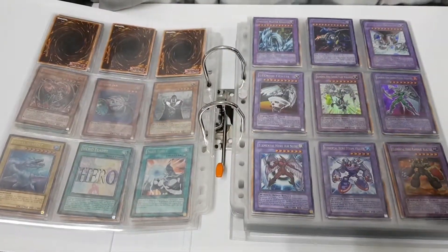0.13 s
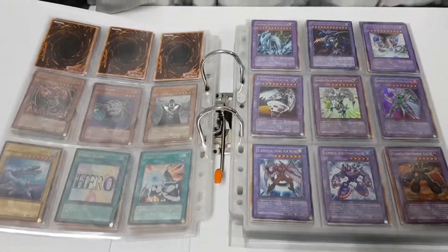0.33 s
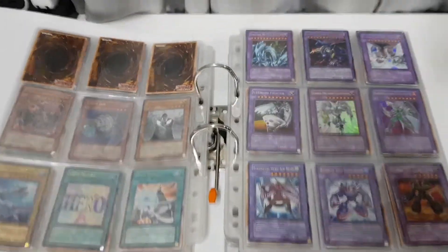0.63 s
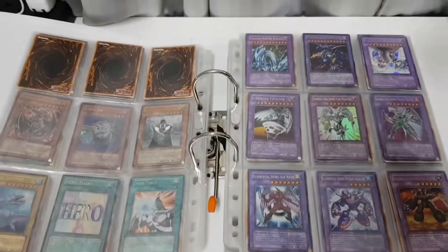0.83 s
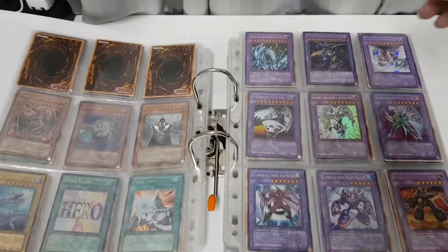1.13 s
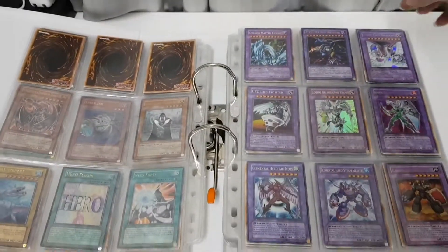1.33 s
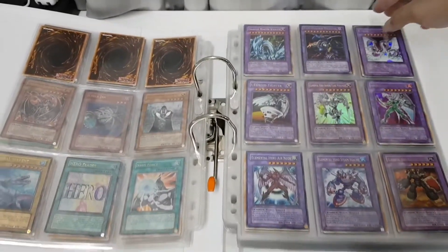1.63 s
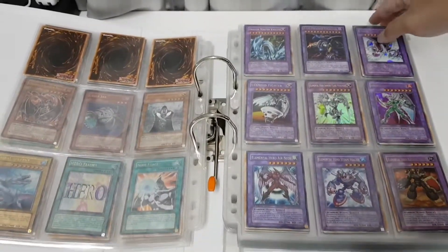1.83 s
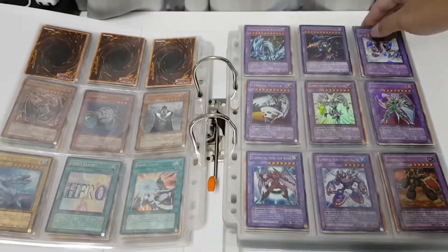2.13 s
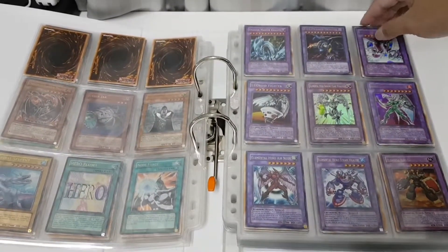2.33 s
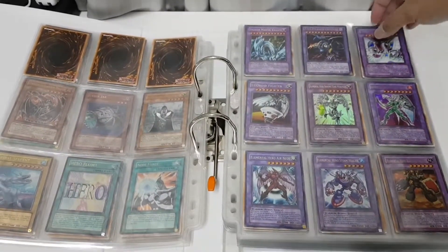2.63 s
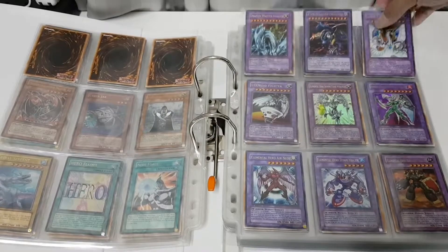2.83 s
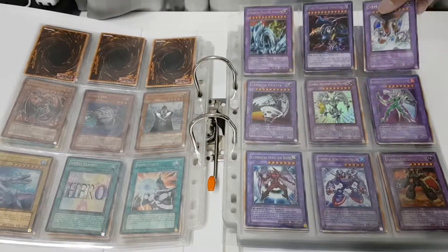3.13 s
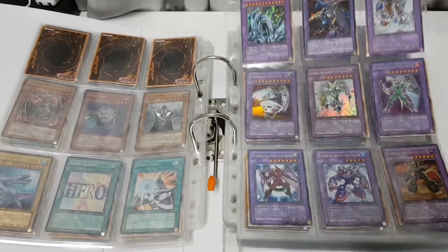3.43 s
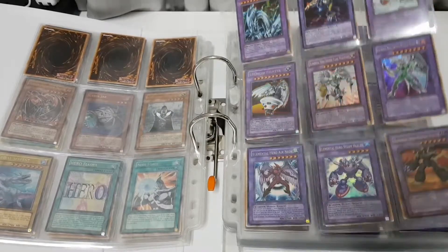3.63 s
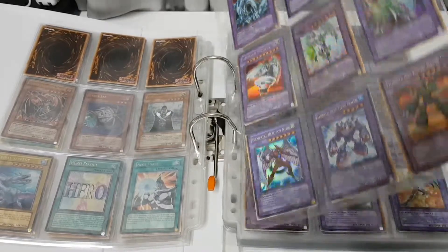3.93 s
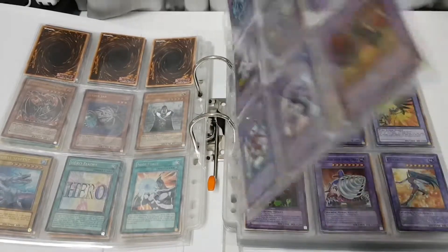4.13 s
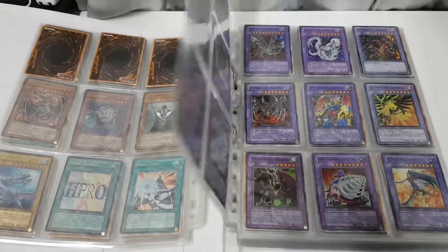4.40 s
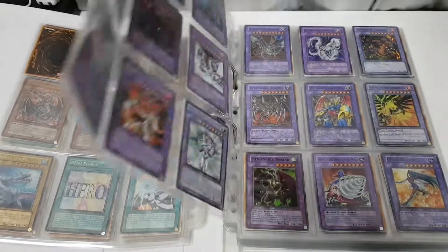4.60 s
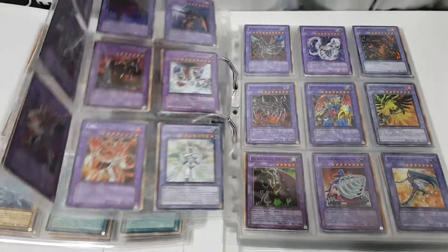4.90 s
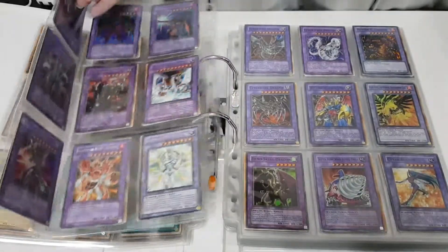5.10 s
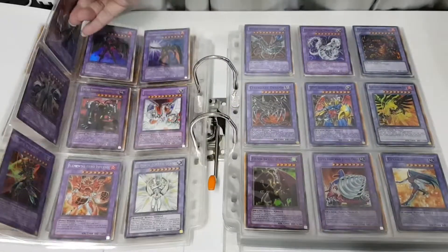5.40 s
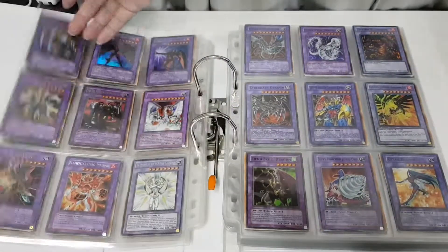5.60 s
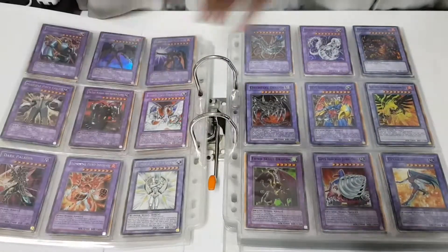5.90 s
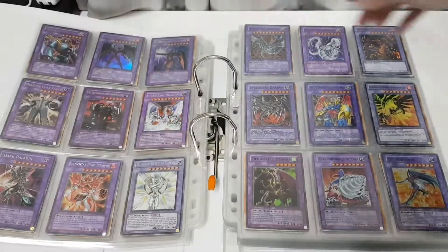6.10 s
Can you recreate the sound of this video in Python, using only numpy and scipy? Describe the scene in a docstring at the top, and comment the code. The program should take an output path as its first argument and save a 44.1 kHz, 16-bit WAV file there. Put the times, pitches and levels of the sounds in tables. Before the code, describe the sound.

Indoors, a low hum of traffic and passing engines comes through the walls, with faint microphone hiss. Early on, wood is knocked twice with a short echo. Nearby, a plastic binder page clicks and crinkles as it is picked up, slides softly, then turns over in a busier cluster of taps and crackles, ending in a small thump as it settles flat.

```python
"""Turning pages in a ring binder

Stiff plastic sleeve pages are lifted and turned on a table. They snap as creases let go, rustle and
scrape as they slide, and one lands with a thump. Two knocks on wood echo from across the room.
Engines and traffic in the street drone through the walls, over a soft microphone hiss."""
import sys
import numpy as np
from scipy import signal
from scipy.fft import rfft, irfft, next_fast_len
from scipy.io import wavfile
from scipy.ndimage import uniform_filter1d

SR = 44100
rng = np.random.default_rng(int(sys.argv[2]) if len(sys.argv) > 2 else 0)


def persist_wave(psi):
    """Save psi, clipped to +-1, as 16-bit WAV."""
    counts = np.round(np.clip(psi, -1, 1) * 32767).astype(np.int16)
    wavfile.write(sys.argv[1], SR, np.atleast_2d(counts).T)


N = 275713
TIME = np.arange(N) / SR
BANDS_HZ = 22 * 2 ** np.arange(0, 9.6, .5)  # half an octave apart

# The five parts of a page's sound, each (frequency [Hz], level [dB])
CRACKLE_TONE = [(5800, -2.5), (6800, 2.5), (7700, 7.5), (8800, -0.5), (9800, -3.5), (11000, -26)]  # small creases
FIZZ_TONE = [(8800, -25.5), (10000, 1), (11000, 0), (12600, 5.5), (14000, -4.5), (15500, -2)]  # the finest creases
FILM_TONE = [(2800, -14.5), (3400, -3), (4000, 3), (4400, -0.5), (5400, -2), (6200, -3), (7200, -34)]  # thin film
POCKET_TONE = [(1400, -28), (1700, -6.5), (2100, -10), (2700, -9), (3300, -14), (4200, -54)]  # card pockets
SHEET_TONE = [(500, -25), (800, 10), (1050, 2.5), (1400, 2.5), (2100, -30)]  # the whole sheet bending
PAGE_PARTS = (CRACKLE_TONE, FIZZ_TONE, FILM_TONE, POCKET_TONE, SHEET_TONE)
# How much louder the fizz is than the crackle: (time [s], level [dB])
FIZZ_OVER_CRACKLE = [(0, -13), (2.3, 0), (2.6, -2), (2.97, 4.5), (3.21, 7.5), (5, -18), (5.345, 1.5),
                     (5.38, 3), (5.64, -2), (5.7, 4), (5.74, -1)]
# Snaps and taps: (time [s], crackle [dB], film [dB], pockets [dB], sheet [dB], share sent to room [dB])
PAGE_SNAPS = [(0.148, -75, -75, -44.5, -47, -12), (2.362, -51, -62, -68, -70, -11),
              (2.386, -39, -52, -50, -47, -6), (2.529, -55, -54, -61, -67, -15),
              (2.556, -45, -47, -60, -62, -15), (2.583, -39, -51, -56, -56, -24),
              (2.5907, -43, -39, -52, -55, -33), (2.597, -42, -41, -61, -42, -22),
              (2.795, -57, -53.5, -83, -77, -4), (2.967, -33, -49, -41, -40, -9),
              (3.2147, -31.5, -46, -69, -42, -6.5), (3.45, -74, -73, -66, -55, -13),
              (3.943, -60, -57, -63, -56, -1), (3.98, -65, -75, -63, -42.5, -22),
              (4.9922, -65, -56, -57, -37.5, -2), (5.047, -62, -63, -57, -40, -17),
              (5.066, -51, -55, -54, -60, -2), (5.108, -55, -56, -53, -34, -18),
              (5.3449, -47, -59, -64, -34.5, -5), (5.3525, -36, -29.5, -44, -59, -20),
              (5.3737, -58, -46, -43, -29, -15), (5.658, -30, -25.5, -58, -75, -26),
              (5.739, -40.5, -31.5, -25.5, -31, -18)]
# A page landing flat: (time [s], level [dB], pitch [Hz], time to fade 60 dB [s])
PAGE_LANDING = [(5.738, -30, 408, 0.032)]
# Sheets sliding: (loud from [s], swell [s], hold [s], crackle [dB], film [dB], pockets [dB], sheet [dB])
PAGE_SLIDES = [(0.0, .01, 0.042, -91, -77, -58, -66), (0.05, 0.027, 0.041, -77, -73.5, -74, -72),
               (0.14, .03, 0.029, -89, -79, -64, -63), (2.28, 0.1, 0.052, -77, -78, -76, -88),
               (2.382, 0.04, 0.0081, -62.5, -69, -66, -62.5), (2.465, 0.089, 0.061, -69.5, -76, -80, -71),
               (2.582, 0.076, 0.0047, -56.5, -64, -66, -63), (3.91, 0.054, 0.056, -90, -89, -83, -63.5),
               (4.0, 0.026, 0.085, -96, -92, -83, -68), (5.02, 0.081, 0.1, -77, -73.5, -73, -59.5),
               (5.17, 0.096, 0.13, -80, -77.5, -69.5, -68), (5.352, 0.047, 0.024, -61.5, -59.5, -60.5, -57),
               (5.401, 0.056, 0.055, -89, -79, -76, -71), (5.54, 0.15, 0.091, -79, -79, -76, -78),
               (5.646, 0.016, 0.012, -56, -55, -67, -82), (5.689, 0.034, 0.0062, -53, -66, -67, -89)]
# Edges dragging:
# (loud from [s], swell [s], hold [s], first pitch [Hz], last pitch [Hz], band width [Hz], level [dB])
EDGE_DRAGS = [(2.459, 0.033, 0.13, 5500, 5400, 900, -68.5), (2.475, .02, .03, 3370, 3370, 900, -74),
              (3.044, .03, .15, 1850, 1850, 401.3, -78), (3.907, 0.038, 0.13, 1104, 1465, 450, -69),
              (4.061, .03, 0.058, 829, 896, 250, -68), (4.051, .03, 0.044, 1490, 1690, 700, -75),
              (5.311, .03, .03, 7370, 6800, 1500, -67), (5.536, 0.045, 0.043, 6260, 6100, 1400, -74),
              (5.613, 0.027, 0.032, 6300, 6400, 1800, -67.5), (5.751, .01, 0.044, 1406, 1785, 700, -59.5)]
# Where the page is: (time [s], left louder by [dB], left later by [ms])
PAGE_PATH = [(0, 5, 0.14), (.3, 4.5, 0.13), (2.2, 13, -0.0043), (3.2, 1, 0.21), (4.1, 6, 0.064),
             (5, 7.5, -0.29), (5.5, 11, -0.14), (6.25, -19, -0.15)]

# Knocks: (time [s], level [dB], left louder by [dB], brightness [dB per octave])
KNOCK_BLOWS = [(0.566, -26.5, 0.5, -2), (0.852, -33.5, 3.5, -6)]
# The notes the wood rings at: (frequency [Hz], level [dB], time to fade 60 dB [s])
WOOD_NOTES = [(266, -7, .18), (360.7, -7.5, 0.33), (469, 0, 0.079), (550, -16, 0.2), (830, -8, 0.27),
              (948, -16, .15), (1105, -11, 0.17), (1236, -11, 0.19), (1310, -20, .1), (1434, -3, 0.09),
              (1778, -7, 0.079), (2003, -12.5, 0.097), (2265, -19, .1)]
# The short crack of a knock: (frequency [Hz], level [dB])
CRACK_TONE = [(130, -11), (240, 5.5), (460, 3), (640, -5), (820, 1.5), (1050, -1.5), (1400, -1),
              (1900, -8.5), (2300, -14.5), (2750, -18), (3400, -23.5), (4300, -27.5), (6000, -39),
              (9000, -51.5)]
# What hard walls send back of a knock: (frequency [Hz], level [dB])
WALL_ECHO_TONE = [(1500, 4), (3500, 3.5)]
# How long the room echoes: (frequency [Hz], time to fade 60 dB [s])
ROOM_FADE = [(250, 0.23), (1000, 0.27), (3000, 0.31), (8000, 0.29), (14000, 0.21)]

# Passing engines, one list each: (time [s], firing rate [Hz], level [dB], brightness [dB per octave])
ENGINE_PASSES = [
    [(0.0, 45.85, -50, 2.5), (0.19, 46.58, -61, 15), (0.466, 44.82, -47.5, 3.5), (0.74, 45.08, -43, -0.5),
     (1.15, 45.91, -50.5, 0.5), (1.4, 45.7, -51, -9)],
    [(1.1, 26.65, -60, -5), (1.67, 28.93, -40.5, 4), (1.84, 29.25, -58, 18.5), (2.25, 31.22, -46, -1),
     (2.48, 31.98, -50.5, 7.5), (2.95, 34.09, -47, 2), (3.3, 35.48, -45, -3.5), (3.55, 35.73, -54, -3.5),
     (3.7, 35.4, -47, -3.5), (3.95, 35.62, -61, 4), (4.1, 35.44, -48, -2.5), (4.98, 33.71, -61, 10.5),
     (5.3, 33.52, -53, -4.5)],
    [(1.95, 45.72, -53.5, 9.5), (2.19, 46.5, -39, -4.5), (2.55, 46.74, -70.5, 14.5)],
    [(4.9, 42.56, -47, 1.5), (5.144, 43.18, -45, -5.5), (5.406, 47.12, -44.5, -5.5), (5.6, 48.21, -43, 3.5),
     (5.67, 48.64, -53.5, 11.5), (5.75, 48.86, -43.5, -0.5), (5.88, 49.64, -50.5, 1), (5.98, 50.75, -52, 8),
     (6.148, 52.9, -47, 1.5), (6.25, 52.7, -56, 12.5)],
]
# Overtones at 2, 3, 4... times the firing rate, one row for each engine: (level [dB], ...)
ENGINE_OVERTONES = [(1.5, -6.5, -21.5, 2.5, -2, -21.5, -32.5),
                    (-1.5, 3.5, -5.5, -1, 0, -7.5, -11.5, -14.5, -14.5),
                    (-19, -7.5, -11, -14, -5.5, -9, -12), (-9.5, 0, -17, -49, -7.5, -7.5, -14.5)]
# What gets indoors, where the room booms near 140 Hz: (frequency [Hz], gain [dB])
THROUGH_WALLS = [(60, -11), (120, -3.5), (140, 9.5), (160, -3.5), (250, -2), (350, -0.5), (500, -29.5)]
# A deep, sinking tone: (time [s], pitch [Hz], level [dB])
DEEP_TONE = [(0.0, 40.5, -47.5), (0.5, 40.8, -51), (1.03, 38.45, -52), (2.1, 33.91, -58)]
# Loudness of far traffic: (time [s], level [dB])
TRAFFIC_LEVEL = [(0.0, -37.5), (0.29, -41), (0.73, -35.5), (1.0, -39.5), (2.12, -44.5), (3.24, -43.5),
                 (4.74, -45), (6.25, -40.5)]
# Tone of far traffic: (frequency [Hz], level [dB])
TRAFFIC_TONE = [(13, -31), (25, -13), (36, -3), (71, -5.5), (120, -2), (190, -5.5), (290, -11.5),
                (334, -13), (609, -34), (808, -33.5), (1090, -46.5), (1500, -56), (1950, -82)]
# How alike the traffic is in both ears: (frequency [Hz], likeness [0 to 1])
EAR_LIKENESS = [(40, 1), (130, 0.87), (300, 0.97), (640, 0.05), (1200, 0)]
# Soft, airy swells of the background noise above 450 Hz: (time [s], boost [dB])
MIDRANGE_SWELL = [(0, 1), (1.2, -2), (2.2, 7.5), (3.4, 0.5), (5, 5), (5.6, 8), (6.25, 8.5)]
# Microphone hiss: (frequency [Hz], level [dB])
HISS_TONE = [(760, -41), (1300, -3.5), (1890, -4.5), (2580, -6.5), (2860, -8.5), (4240, -8), (5970, -10.5),
             (9000, -10), (14900, -7), (15500, -11)]
# Tone of a faint, narrow hiss: (frequency [Hz], level [dB])
THIN_HISS_TONE = [(6900, -24), (7550, -2), (7850, -2), (8500, -24)]
# Loudness of that narrow hiss: (time [s], level [dB])
THIN_HISS_LEVEL = [(0, -89), (.5, -101.5), (4.4, -104), (4.7, -83), (5.8, -83), (6.0, -100)]


def snaps(fade_s=0.011, bounce_s=0.00045, bounce_db=-14):
    """A crease lets go: all five parts give a burst of noise, and the room gets one short pulse."""
    t = np.arange(4096) / SR
    high = np.zeros((2, N + len(t)))
    low, to_room = np.zeros((2, N + len(t)))
    click = 1. * (np.arange(len(t)) == 200)
    pulses = [colour(click, tone) / np.sqrt(len(t)) for tone in PAGE_PARTS]
    attack = 1 - np.exp(-8 * t / fade_s)
    part_fades_s = fade_s * np.array([1.06, 0.79, 0.71, 1.55, 1.38])  # big parts ring longer
    for start, *parts_db, room_db in PAGE_SNAPS:
        at = slice(int(start * SR), int(start * SR) + len(t))
        noise = rng.standard_normal((5, 2, len(t)))
        noise[:, 1] += 0.8 * noise[:, 0]  # both ears hear much the same crack
        bursts = []
        for part, db in enumerate(with_fizz(start, *parts_db)):
            shape = undb(db - 60 * t / part_fades_s[part]) * attack
            energy = np.sum(shape ** 2)
            burst = shape * colour(noise[part], PAGE_PARTS[part])
            burst += undb(bounce_db) * np.roll(burst, int(bounce_s * SR), axis=1)  # off the table
            bursts.append(burst * np.sqrt(energy / np.sum(burst ** 2, axis=1, keepdims=True)))
            to_room[at] += undb(room_db) * np.sqrt(energy) * pulses[part]
        high[:, at] += sum(bursts[:3])
        low[at] += bursts[3][0] + bursts[4][0]
    thump = landing_thump()
    return place(low[:N] + thump, high[:, :N]), to_room[:N] + thump


def landing_thump():
    """A page lands flat and gives one low note that dies quickly."""
    start, db, hz, fade_s = PAGE_LANDING[0]
    age = np.maximum(TIME - start, 0)
    return undb(db - 60 * age / fade_s) * np.sin(2 * np.pi * hz * age)


def rustle(slips_per_s=450, settle_s=0.0058):
    """Sliding sheets stick and slip: many tiny, uneven jolts stir up noise in the five parts."""
    size = next_fast_len(N)
    slips = (rng.random(size) < slips_per_s / SR) * undb(3.5 * rng.exponential(size=size))
    push = 0.08 + signal.lfilter([1], [1, -np.exp(-1 / (settle_s * SR))], slips)
    gains = 0
    for start, swell_s, hold_s, *parts_db in PAGE_SLIDES:
        gains += undb(with_fizz(start, *parts_db))[:, None] * stroke(start, swell_s, hold_s)
    parts = []
    for gain, tone in zip(gains, PAGE_PARTS):
        friction = np.sqrt(push) * rng.standard_normal((2, size))
        parts.append(gain * colour(friction, tone)[:, :N])
    return place(parts[3][0] + parts[4][0], sum(parts[:3])), undb(-6) * sum(parts)[0]


def scrapes():
    """An edge drags over a sheet and sings: a narrow band of rough noise whose pitch can glide."""
    low, high = 0, 0
    for start, swell_s, hold_s, first_hz, last_hz, width_hz, db in EDGE_DRAGS:
        hz = np.interp(TIME, [start, start + hold_s], [first_hz, last_hz])
        lowpass = signal.butter(2, width_hz / 2, fs=SR, output="sos")
        real, imag = signal.sosfilt(lowpass, rng.standard_normal((2, 2, N)))
        band = ((real + 1j * imag) * np.exp(2j * np.pi * np.cumsum(hz) / SR)).real  # shift up to hz
        band = band / band.std() * undb(db + 4.5 * wander(120)) * stroke(start, swell_s, hold_s)
        if first_hz < 3000:
            low += band[0]
        else:
            high += band
    return place(low, high), undb(-11) * (low + high[0])


def knocks(push_s=0.0018, crack_fade_s=0.051, ring_to_room=0.12):
    """A knuckle makes the wood ring and crack; mostly the crack goes on to echo in the room."""
    t = np.arange(SR // 2) / SR
    direct, to_room = np.zeros((2, N + SR)), np.zeros(N + SR)
    contact = np.sin(np.pi / 2 * np.minimum(t / push_s, 1)) ** 2
    for start, db, pan_db, tilt_db in KNOCK_BLOWS:
        ring = 0
        for hz, note_db, fade_s in WOOD_NOTES:
            struck_db = note_db + tilt_db * np.log2(hz / 800) + 0.5 * rng.standard_normal()
            ring += undb(struck_db - 60 * t / fade_s) * np.sin(2 * np.pi * hz * t)
        tone = [(hz, level + 0.4 * tilt_db * np.log2(min(hz, 2000) / 800)) for hz, level in CRACK_TONE]
        crack = colour(rng.standard_normal((2, len(t))), tone) * undb(3.5 - 60 * t / crack_fade_s)
        crack = crack + 0.033 * crack[::-1]  # the ears share a little of it
        at = slice(int(start * SR), int(start * SR) + len(t))
        direct[:, at] += pan(undb(db) * contact * (ring + crack), pan_db)
        off_walls = colour(contact * (ring_to_room * ring + crack[0]), WALL_ECHO_TONE)
        to_room[at] += undb(db + 4) * off_walls * np.std(contact * crack[0])
    return direct[:, :N], to_room[:N]


def room(sound, build_s=0.0058, late_wall_s=0.057, late_wall_db=-10):
    """Many quick echoes, different in each ear, blur into a tail; one wall answers late."""
    t = np.arange(SR // 2) / SR
    noise = rng.standard_normal((2, len(t)))
    tail = sum(colour(noise, [(1, 0)], hz) * undb(-60 * t / look_up(ROOM_FADE, hz))
               for hz in BANDS_HZ[6:])
    late_wall = (t > late_wall_s) * (t < late_wall_s + .02)
    tail *= (1 - np.exp(-t / build_s)) * (1 + undb(late_wall_db) * late_wall)
    tail /= np.sqrt(np.sum(tail ** 2) / 2)
    return signal.fftconvolve(sound[None], tail, axes=1)[:, :N]


def engines(boom_hz=140):
    """Each engine's firing makes a stack of overtones, which waver on their way round the houses."""
    out = 0
    for engine, overtones in zip(ENGINE_PASSES, ENGINE_OVERTONES):
        firing_hz, db, tilt_db = curves(engine)
        running = fade_in_out(engine, fade_s=0.18)
        phase = 2 * np.pi * np.cumsum(firing_hz * (1 + 0.002916 * wander(12))) / SR
        for k, overtone_db in enumerate(overtones, 2):
            hz = k * firing_hz
            waver_db = (wander(3.09) + 2.5 * wander(9)) * np.sqrt(k / 4)  # higher ones waver more
            ear_shift = 0.23 * rng.standard_normal() * np.array([[.5], [-.5]])
            tone = np.sqrt(2) * np.sin(k * phase + k * k + ear_shift)
            outdoor_db = db + overtone_db + tilt_db * np.log2(hz / boom_hz) + waver_db
            out += running * undb(outdoor_db + look_up(THROUGH_WALLS, hz)) * tone
    return pan(out, 1.4)


def drone():
    """One deep tone sinks and fades among the engines."""
    hz, db = curves(DEEP_TONE)
    tone = np.sqrt(2) * np.sin(2 * np.pi * np.cumsum(hz) / SR)
    return pan(fade_in_out(DEEP_TONE, fade_s=.01) * undb(db) * tone, 1.4)


def traffic():
    """Far traffic rumbles in noise bands that each flicker; the bass is alike in both ears."""
    (db,), (swell_db,) = curves(TRAFFIC_LEVEL), curves(MIDRANGE_SWELL)
    noise = rng.standard_normal((2, next_fast_len(N)))
    tone = [(1, -90), *TRAFFIC_TONE, (3000, -110)]
    out = 0
    for hz in BANDS_HZ[:14]:
        shared, apart = colour(noise, tone, hz)[:, :N]
        likeness = look_up(EAR_LIKENESS, hz)
        band = np.sqrt(1 + likeness) * shared + np.sqrt(1 - likeness) * np.array([apart, -apart])
        flicker_db = 2.2 * wander(6)
        out += undb(flicker_db + swell_db * (hz > 450)) * band
    return pan(out / np.sqrt(np.mean(out ** 2)) * undb(db), 1.4)


def hiss(steady_db=-75.5):
    """Two microphones make their own steady noise; a thin, high band comes and goes."""
    noise = rng.standard_normal((4, next_fast_len(N)))
    shared, apart = colour(noise[:2], HISS_TONE)[:, :N]
    steady = undb(steady_db) * np.array([shared + apart, shared - apart])
    thin_db, = curves(THIN_HISS_LEVEL)
    return steady + undb(thin_db) * colour(noise[2:], THIN_HISS_TONE)[:, :N]


def place(low, high, treble_follow=0.74):
    """The page moves across: low parts reach one ear late, and the treble swings less far."""
    pan_db, lag_ms = curves(PAGE_PATH)
    low_pair = np.array([np.interp(TIME - side * lag_ms / 2000, TIME, low) for side in (1, -1)])
    return pan(low_pair, pan_db) + pan(high + 0.02 * high[::-1], treble_follow * pan_db)


def with_fizz(time_s, crackle_db, *rest_db):
    """Levels of all five parts; the fizz follows the crackle."""
    fizz_db = crackle_db + np.interp(time_s, *np.transpose(FIZZ_OVER_CRACKLE))
    return (crackle_db, fizz_db, *rest_db)


def stroke(loud_from, swell_s, hold_s, fall_s=0.029):
    """One movement swells, holds and falls; swell_s and fall_s each cover 20 dB."""
    before = np.maximum(loud_from - TIME, 0) / swell_s
    after = np.maximum(TIME - loud_from - hold_s, 0) / fall_s
    return undb(-20 * (before + after))


def undb(db):
    """Turn decibels into a number to multiply by."""
    return 10 ** (np.asarray(db) / 20)


def look_up(table, hz):
    """Read between a table's (frequency, value) points, with octaves evenly spaced."""
    points_hz, values = np.transpose(table)
    return np.interp(np.log(np.maximum(hz, 1)), np.log(points_hz), values)


def curves(table):
    """Turn each column after the time into one value per sample."""
    times, *columns = np.transpose(table)
    return [np.interp(TIME, times, column) for column in columns]


def fade_in_out(table, fade_s):
    """Fade in at a table's first time (unless that is 0) and out after its last."""
    start, end = table[0][0], table[-1][0]
    return np.clip(np.minimum(TIME - start + (start == 0), end - TIME + fade_s) / fade_s, 0, 1)


def colour(sound, tone, band_hz=None):
    """Filter by a tone table, then keep the band round band_hz or else scale to a power of 1."""
    size = sound.shape[-1]
    hz = np.arange(size // 2 + 1) * SR / size
    spectrum = rfft(sound) * undb(look_up(tone, hz))
    if band_hz:
        octaves_away = np.log2(np.maximum(hz, 1) / band_hz)
        return irfft(spectrum * np.cos(np.pi * np.clip(octaves_away, -.5, .5)), size)
    shaped = irfft(spectrum, size)
    return shaped / np.sqrt(np.mean(shaped ** 2, axis=-1, keepdims=True))


def wander(steps_per_s):
    """A smooth random curve that strays about 1 either side of zero."""
    hold = int(SR / steps_per_s)
    steps = np.repeat(rng.standard_normal(N // hold + 1), hold)
    return 1.3 * uniform_filter1d(uniform_filter1d(steps, hold), hold)[:N]


def pan(sound, pan_db):
    """Make the left side pan_db louder than the right."""
    return sound * undb(np.vstack([pan_db, -pan_db]) / 2)


def scene():
    """Mix the indoor sounds and their echo with the street and the hiss."""
    direct, to_room = zip(knocks(), snaps(), rustle(), scrapes())
    return sum(direct) + room(sum(to_room)) + engines() + drone() + traffic() + hiss()


def record(dry, lowest_hz=35, highest_hz=15650):
    """Cut away the deepest bass and the highest treble."""
    dry = signal.sosfilt(signal.butter(5, lowest_hz, "high", fs=SR, output="sos"), dry)
    return signal.sosfilt(signal.ellip(10, .2, 70, highest_hz, fs=SR, output="sos"), dry)


dry = scene()
out = record(dry)
persist_wave(out)
```